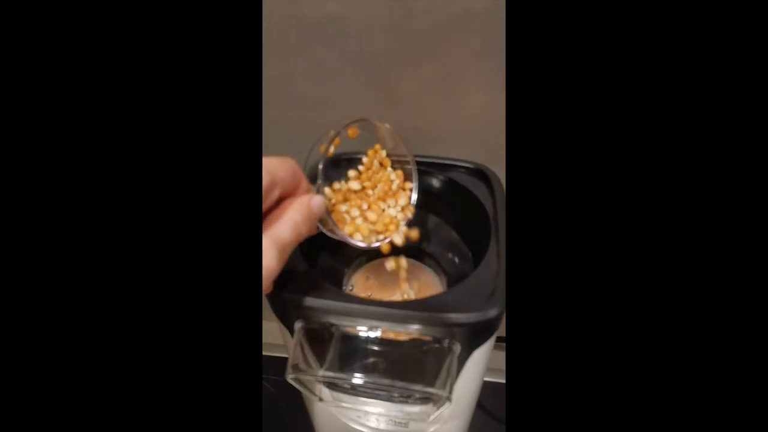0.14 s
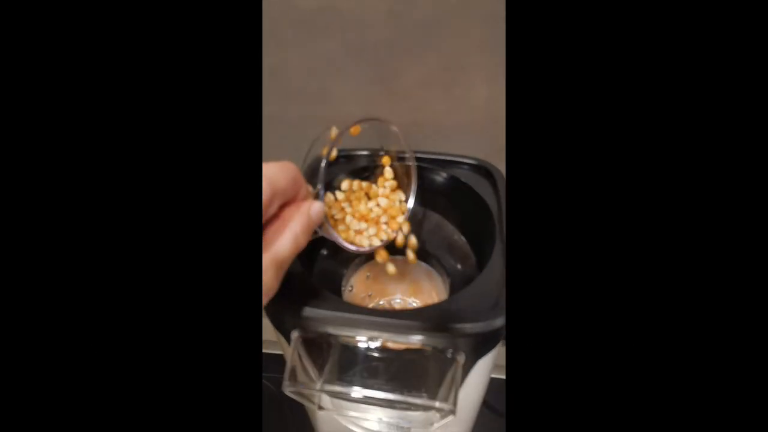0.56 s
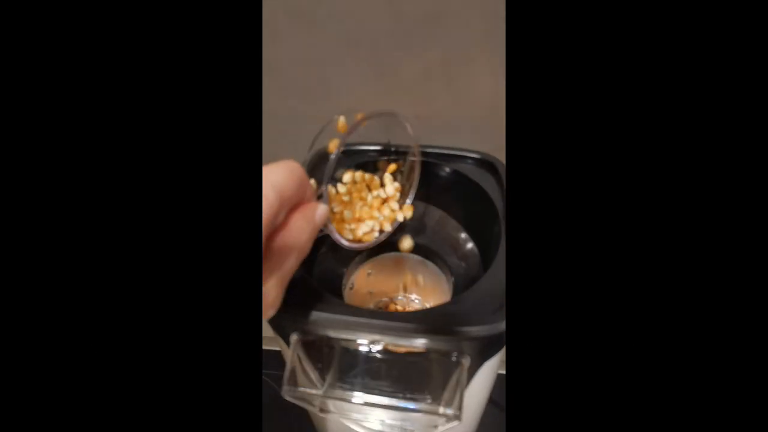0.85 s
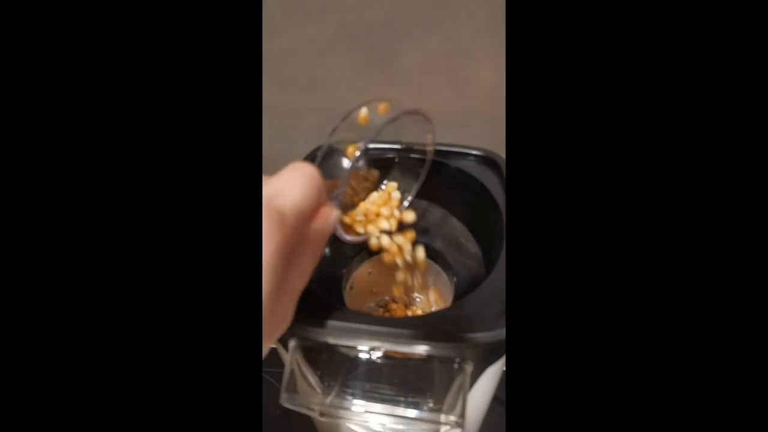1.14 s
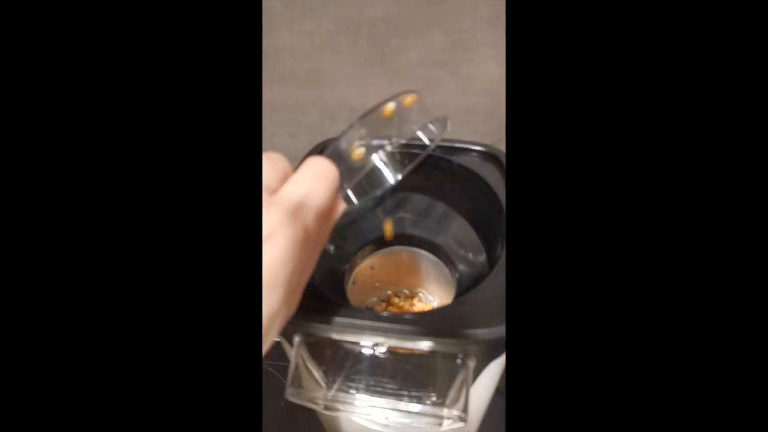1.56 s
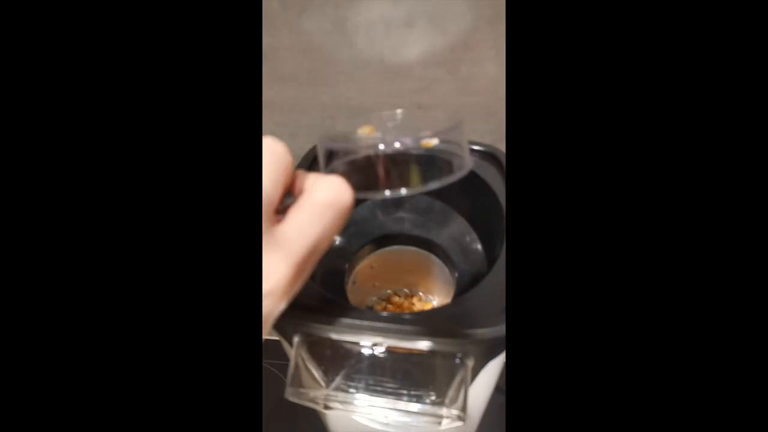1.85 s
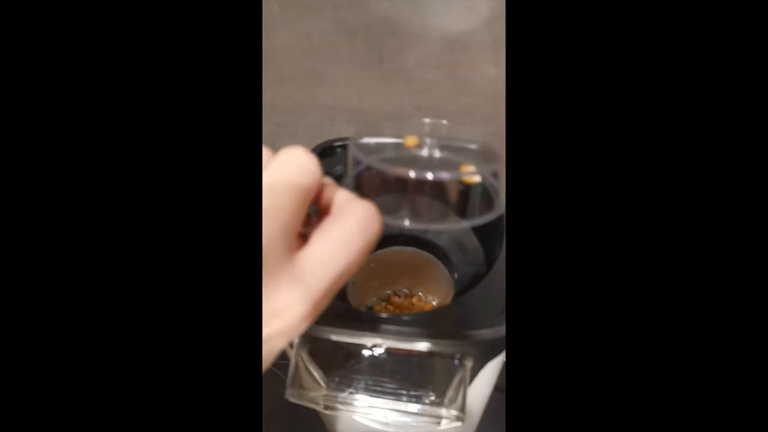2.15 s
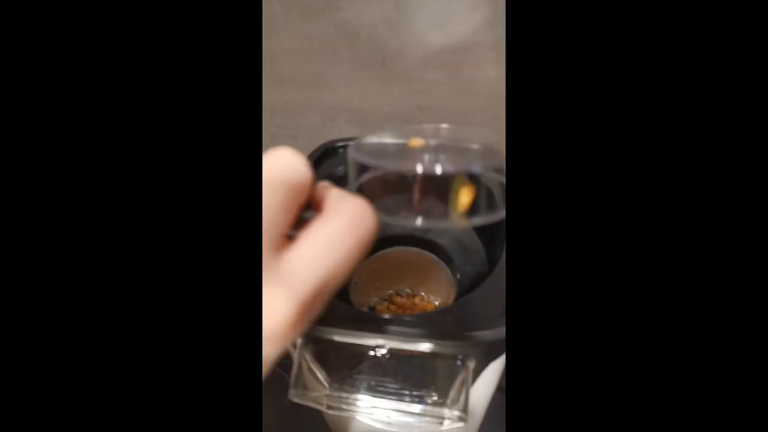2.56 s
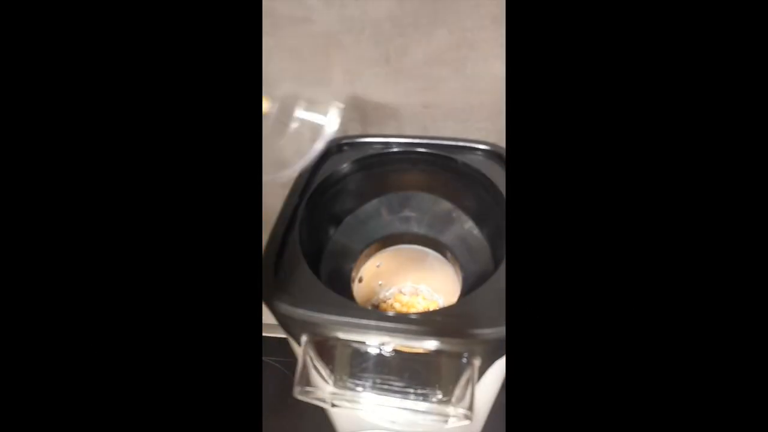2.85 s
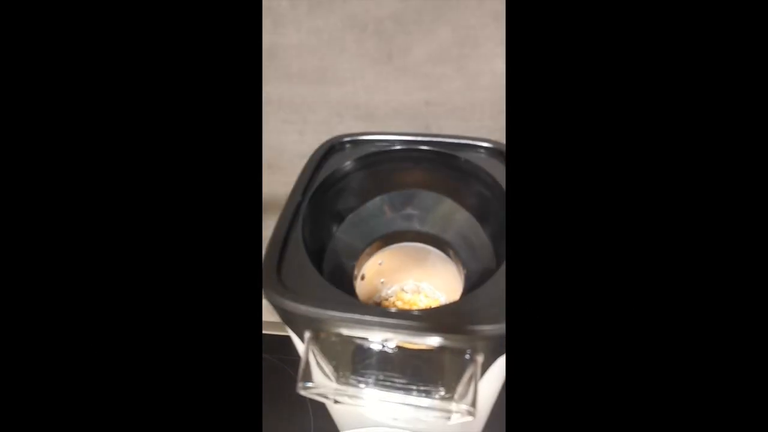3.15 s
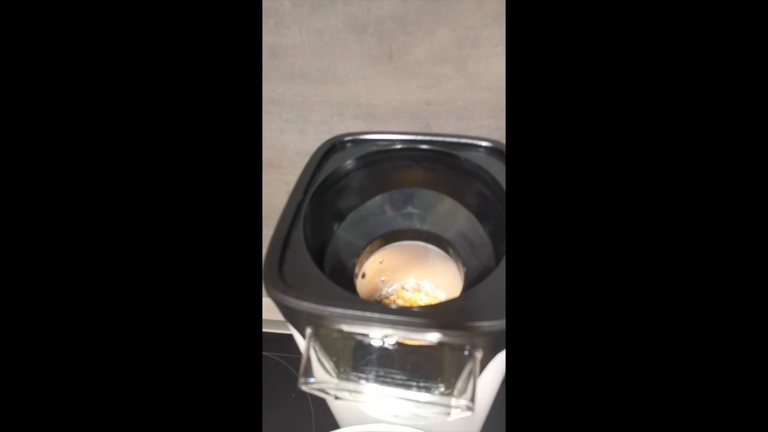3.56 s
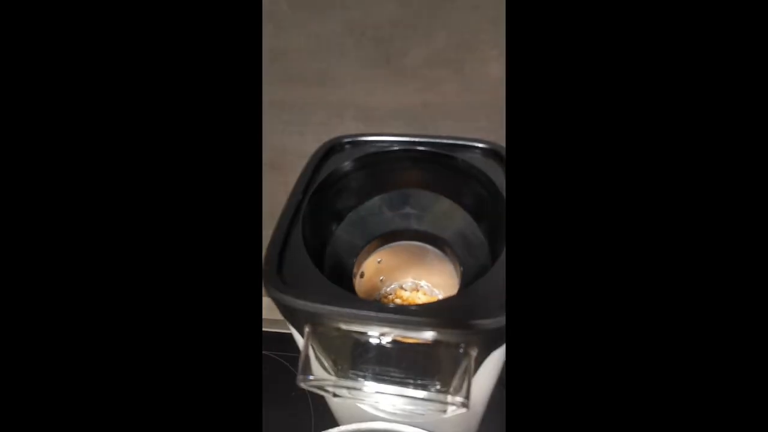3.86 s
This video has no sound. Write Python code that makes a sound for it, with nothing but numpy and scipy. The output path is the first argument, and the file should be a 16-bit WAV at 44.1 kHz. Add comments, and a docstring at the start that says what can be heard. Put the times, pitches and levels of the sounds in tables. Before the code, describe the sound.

Dry corn kernels pour in a dense, bright rattle into a popcorn machine, ringing briefly on bare metal, then scattered ticks, a couple of taps and a faint rustle; close stereo microphone, small quiet room.

```python
"""In a small room with a low hum, dry corn kernels are tipped from a glass bowl into a popcorn machine.
Decaying resonances of the bare metal pan sound at the start, along with dense random contacts of
kernel on kernel, which outlast them. The last rush strikes the plastic funnel, and lone kernels
tick in as short bursts of coloured noise. The bowl is drawn away with a few taps and a soft rustle
of grainy noise; the room adds a decaying tail."""
import sys
import numpy as np
from scipy import signal
from scipy.fft import rfft, irfft, next_fast_len
from scipy.io import wavfile
from scipy.ndimage import uniform_filter1d

SR = 44100
rng = np.random.default_rng(int(sys.argv[2]) if len(sys.argv) > 2 else 0)


def master_out(mix):
    """Clip the mix to full scale and print it as 16-bit PCM to the path in sys.argv[1]."""
    frames = np.transpose(np.atleast_2d(mix))
    ceiling = np.clip(frames, -1, 1)
    pcm = np.round(ceiling * 32767).astype(np.int16)
    wavfile.write(sys.argv[1], SR, pcm)


N = 176400

# All spectra are relative: filtering restores the power of white noise.
# Spectrum of still air: (frequency [Hz], level [dB])
AIR_SPECTRUM = [(30, 0), (300, -13), (8000, -32.5), (11000, -44.5)]
# Low drone: (time [s], level [dB])
DRONE_LEVEL = [(2.08, -73.5), (2.3, -61), (2.6, -71.5), (3.15, -67.5), (4, -74.5)]
# Spectrum of the drone: (frequency [Hz], level [dB])
DRONE_SPECTRUM = [(90, -34.5), (130, 4.5), (172, 13), (240, -46.5)]
# Stream of kernels: (time [s], level [dB])
STREAM_LEVEL = [(0, -28), (.12, -34), (.26, -34.5), (.65, -37.5), (.95, -40.5), (1.17, -43), (1.27, -34),
                (1.46, -36), (1.535, -43), (1.56, -50), (1.9, -85.5)]
# Clumps landing in the stream, before CLUMP_DB: (time [s], level [dB])
CLUMP_BLOWS = [(0.016, -27.5), (.035, -18.5), (0.153, -27.5), (.2124, -28.5), (0.226, -27), (0.287, -27.5),
               (.328, -24.5), (0.362, -25.5), (.392, -23.5), (.424, -23.5), (.446, -25.5), (.514, -24.5),
               (.528, -24.5), (0.561, -22), (.571, -27), (.6, -22.5), (.619, -23.5), (.667, -24.5),
               (0.676, -22.5), (0.7307, -21), (.755, -27), (.805, -22), (.838, -21.5), (.868, -26.5),
               (0.913, -21.5), (0.994, -24), (1.0435, -21), (1.082, -21), (1.118, -22), (1.198, -21),
               (1.22, -20.5), (1.252, -23), (1.397, -23), (1.448, -24.5), (1.505, -23), (1.522, -22)]
# Spectrum of a kernel's click in the chamber: (frequency [Hz], level [dB])
RATTLE_SPECTRUM = [(800, -25), (1500, -16.5), (1900, -25.5), (2220, -10.5), (2550, -30.5), (3300, -9),
                   (4000, -13.5), (5850, -6), (6350, -8.5), (6950, -1), (8000, 1), (8350, -6), (9000, -7),
                   (10100, -17.5), (12000, -26)]
# Left-right balance of the pour: (frequency [Hz], left minus right [dB])
POUR_BALANCE = [(300, 6), (2300, -6.5), (5000, -2.5), (6800, 5.5), (9000, -3.5), (12000, 0)]
# Resonances of the bare pan: (frequency [Hz], bandwidth [Hz], relative level [dB])
PAN_MODES = [(1171, 260, -6), (1497, 350, -0.5), (2930, 810, -6.5), (5520, 87, 1.5), (9500, 5000, -13)]
# Hard blows on the housing, before PUSH_DB and CRACK_DB: (time [s], level [dB])
HARD_BLOWS = [(0.018, -31), (.156, -32), (.196, -33), (0.287, -44), (.5, -50), (.514, -46.5), (.621, -48),
              (.731, -39), (1.045, -53.5), (1.562, -51), (1.98, -54), (2.748, -50)]
# Spectrum of the shaken housing: (frequency [Hz], level [dB])
HOUSING_SPECTRUM = [(25, 1), (200, -6.5), (800, -7.5), (2200, -1.5), (7000, -42.5)]
# Soft handling bumps: (time [s], level [dB])
SOFT_BUMPS = [(2.748, -55.5), (3.528, -62.5), (3.61, -68.5)]
# Hollow resonances of the housing: (frequency [Hz], bandwidth [Hz], relative level [dB])
HOUSING_MODES = [(151, 18, 4), (250, 50, -5.5), (484, 34, 3), (694, 70, -3.5), (1321, 24, -1.5),
                 (2280, 60, -9.5)]
# Reverberation of the room: (frequency [Hz], 60 dB decay time [s])
ROOM_DECAY = [(200, 0.58), (7000, 0.5)]
# Single ticks of kernels and bowl; body and fine treble are before BODY_DB and FINE_DB:
# (time [s], level [dB], body re level [dB], bright ring re level [dB], fine treble re level [dB])
TICK_BLOWS = [(1.562, -29.5, -0.5, 0, 6.5), (1.57, -32, -2.5, -9, -2), (1.596, -29.5, -7, -7, -1),
              (1.615, -37, -4, -4, -3), (1.692, -28, -0.5, -4.5, -2), (1.728, -27.5, -6.5, -15, -8),
              (1.747, -44, 4.5, 4, 1.5), (1.829, -43, -2.5, 9, 14.5), (1.919, -32, 1, 0, 4),
              (1.979, -34, 1, 2, 13.5), (2.025, -32.5, -2.5, -7.5, -20), (2.748, -35.5, 0.5, 5.5, 12.5),
              (2.851, -37, -6, -27, -21), (2.91, -36.5, 2.5, 1, -9)]
# Spectrum of a click on the funnel wall: (frequency [Hz], level [dB])
CLICK_SPECTRUM = [(2000, -31), (3300, -4.5), (5900, -6), (7000, -1.5), (11000, -43.5)]
# Spectrum of the funnel's hollow body: (frequency [Hz], level [dB])
BODY_SPECTRUM = [(600, -28), (1020, -3), (1800, -8), (2200, 3), (2550, -13), (3400, -24.5)]
# Spectrum of a tick's fine treble edge: (frequency [Hz], level [dB])
FINE_SPECTRUM = [(6000, -28.5), (10000, -9), (13400, -14)]
# Bright resonances of a tick: (frequency [Hz], bandwidth [Hz], relative level [dB])
RING_MODES = [(7010, 160, -7.5), (7780, 450, 2), (9530, 1100, -13)]
# Bowl and sleeve drawn away: (time [s], level [dB])
RUSTLE_LEVEL = [(2.74, -120), (2.81, -64.5), (2.87, -55), (2.96, -72), (3.11, -57.5), (3.22, -67.5),
                (3.38, -85), (3.55, -120)]
# Spectrum of the rubbing: (frequency [Hz], level [dB])
RUSTLE_SPECTRUM = [(100, -15), (300, -4.5), (3000, -2), (4500, -12), (7500, -10.5), (12000, -40)]

AIR_DB, HUM_HZ, HUM_DB = -73.5, 97.4, -71
# Contacts in the stream: mean rate, spread of sizes, 60 dB decay time
CONTACTS_PER_S, CONTACT_SPREAD_DB, CONTACT_T60_S = 700, 3.5, 0.012
CLUMP_DB, CLUMP_T60_S = -6.5, 0.066
CLUMP_THUD_DB, PAN_THUD_DB = -20, -9  # clumps and the pan shake the housing too
SLIDE_S, SLIDE_END_S, SLIDE_DB = 1.19, 1.535, -47  # the last rush strikes the funnel wall
KERNEL_VARIETY_DB, TICK_VARIETY_DB = 2.5, 2.5  # no two kernels ring alike
PAN_DB, PAN_BARE_S, PAN_MUFFLE_DB_PER_S = -37, 0.14, 111.5  # the growing heap damps the pan
PUSH_DB, CRACK_DB = 20.5, 15  # a hard blow's push on the housing, and its sharp crack
RISE_S = 0.00035  # time constant of a blow's onset
TICK_HOLD_S, TICK_T60_S = 0.0021, 0.036
BODY_DB, FINE_DB = -10.5, -18.5
TICK_LEAN_DB = -4.5  # left minus right
FUNNEL_DB, FUNNEL_GROWS = -18.5, 0.71  # the ring grows as this power of the rubbing, so more slowly
ROOM_DB, RING_ROOM_SHARE = -10, 0.4
TOP_HZ = 15100  # upper band limit


def amp(db):
    """Logarithmic level: decibels become an amplitude ratio."""
    return 10 ** (np.asarray(db) / 20)


def unit(x):
    """Power normalisation: scale to an rms of 1."""
    return x / np.sqrt(np.mean(x ** 2) + 1e-20)


def along(points, hz):
    """Logarithmic interpolation: (frequency, value) points joined on a log frequency axis."""
    f, v = np.transpose(points)
    return np.interp(np.log(hz + 1), np.log(f + 1), v)


def level(rows):
    """Amplitude envelope: gain per sample, with the level linear in decibels between points."""
    return amp(np.interp(np.arange(N) / SR, *np.transpose(rows)))


def filtered(x, response):
    """Linear filtering: multiply the spectrum by a function of frequency."""
    m = 2 * next_fast_len(N)
    spectrum = rfft(x, m)
    return irfft(spectrum * response(np.fft.rfftfreq(m, 1 / SR)), m)[..., :N]


def coloured(x, points):
    """Minimum-phase filtering: a causal spectrum that keeps the power of white noise."""
    def response(hz):
        cepstrum = irfft(np.log(unit(amp(along(points, hz)))))
        # Folding the cepstrum onto positive time makes the filter causal.
        half = len(cepstrum) // 2
        cepstrum[1:half] *= 2
        cepstrum[half + 1:] = 0
        return np.exp(rfft(cepstrum))
    return filtered(x, response)


def resonate(x, modes):
    """Modal resonance: band-pass modes of alternating sign that keep the power of white noise."""
    def response(hz):
        total = 0
        for k, (centre, width, db) in enumerate(modes):
            damping = 1j * hz * width
            total = total + (-1) ** k * amp(db) * damping / (centre ** 2 - hz ** 2 + damping)
        return total / np.sqrt(np.mean(np.abs(total) ** 2))
    return filtered(x, response)


def noise(alike):
    """Partial coherence: stereo white noise with a share of its power common to both sides."""
    left, right, common = rng.standard_normal((3, N))
    share = np.clip(alike, 0, 1)
    return np.sqrt(share) * common + np.sqrt(1 - share) * np.array([left, right])


def varied(depth_db):
    """Spectral fluctuation: stereo noise whose random colour changes every few milliseconds."""
    z = signal.stft(noise(0), nperseg=256)[2]
    field = rng.standard_normal(z.shape[1:])
    field = uniform_filter1d(field, size=3, axis=0)  # across frequency
    field = unit(uniform_filter1d(field, size=4, axis=1))  # across time
    gain = unit(amp(depth_db * np.clip(field, -2, 2)))
    return signal.istft(z * gain, nperseg=256)[1][:, :N]


def sides(lean_db):
    """Stereo level difference: left and right gains, half the difference each."""
    return amp(np.multiply.outer([.5, -.5], np.atleast_1d(lean_db)))


def fade(t, t60):
    """Exponential damping: amplitude falls 60 dB in t60 seconds."""
    return np.exp(-np.log(1000) * t / t60)


def impulses(rows):
    """Impulsive excitation: one spike for each (time [s], level [dB]) row."""
    s, db = np.transpose(list(rows))
    return np.bincount(np.abs(np.round(s * SR)).astype(int), amp(db), N)


def power_sum(spikes, shape):
    """Energy addition: the powers of overlapping envelopes add."""
    return np.sqrt(np.abs(signal.fftconvolve(np.square(spikes), np.square(shape))[:N]))


def bursts(rows, hold, t60):
    """Transient envelope: each blow rises, holds briefly and decays exponentially."""
    t = np.arange(N) / SR
    shape = (1 - np.exp(-t / RISE_S)) * fade(np.maximum(t - hold, 0), t60)
    return power_sum(impulses(rows), shape)


def patter(rate, spread_db, t60):
    """Shot noise: envelope of tiny contacts at random times, scaled to rms 1."""
    struck = rng.random(N) < rate / SR
    sizes = struck * amp(spread_db * np.clip(rng.standard_normal(N), -2, 2))
    return unit(power_sum(sizes, fade(np.arange(SR // 10) / SR, t60)))


def background():
    """Stationary tone and noise: a steady sine hum and still air, with a low drone of varying level."""
    hum = amp(HUM_DB) * unit(np.sin(2 * np.pi * HUM_HZ * np.arange(N) / SR)) * sides(-5)
    air = amp(AIR_DB) * coloured(noise(0.16), AIR_SPECTRUM)
    drone = level(DRONE_LEVEL) * coloured(noise(0.18), DRONE_SPECTRUM)
    return hum + air + drone


def pour():
    """Superposed impacts: stream and clumps click in the chamber; the last rush hits the funnel."""
    t = np.arange(N) / SR
    stream = level(STREAM_LEVEL) * (t < STREAM_LEVEL[-1][0])
    stream = stream * patter(CONTACTS_PER_S, CONTACT_SPREAD_DB, CONTACT_T60_S)
    clumps = amp(CLUMP_DB) * bursts(CLUMP_BLOWS, 0.0012, CLUMP_T60_S)
    clumps = clumps * patter(rate=2500, spread_db=1, t60=0.0035)
    contacts = np.hypot(stream, clumps) * varied(KERNEL_VARIETY_DB)
    rattle = coloured(contacts, RATTLE_SPECTRUM)
    thud = amp(CLUMP_THUD_DB) * coloured(clumps * noise(0), HOUSING_SPECTRUM)
    rush = amp(SLIDE_DB) * (t > SLIDE_S) * (t < SLIDE_END_S)
    rush = rush * patter(rate=600, spread_db=9.5, t60=TICK_T60_S) * varied(TICK_VARIETY_DB)
    funnel = coloured(rush, CLICK_SPECTRUM) + amp(BODY_DB) * coloured(rush, BODY_SPECTRUM)
    return filtered(rattle + thud + funnel, lambda hz: sides(along(POUR_BALANCE, hz)))


def pan():
    """Modal excitation: kernels ring and drum on bare metal until the heap covers it."""
    covered_s = np.maximum(np.arange(N) / SR - PAN_BARE_S, 0)
    bareness = amp(PAN_DB - PAN_MUFFLE_DB_PER_S * covered_s)
    blows = bareness * patter(rate=700, spread_db=0.5, t60=.005) * noise(0.21)
    return resonate(blows, PAN_MODES) + amp(PAN_THUD_DB) * coloured(blows, HOUSING_SPECTRUM)


def room(x):
    """Reverberation: a small room's diffuse tail, with a decay time for each frequency."""
    hz, t, z = signal.stft(rng.standard_normal((2, SR * 3 // 4)), SR, nperseg=256)
    tail = signal.istft(z * fade(t, along(ROOM_DECAY, hz)[:, None]), SR, nperseg=256)[1]
    tail = tail / np.linalg.norm(tail[0])
    tail = np.pad(tail, ((0, 0), (SR // 200, 0)))  # the tail starts 5 ms late
    mono = x.sum(axis=0)[None] / np.sqrt(2)
    return signal.fftconvolve(mono, tail, axes=1)[:, :N]


def knocks():
    """Impulse response: a hard blow is a dull push and sharp crack; a soft bump rings the housing."""
    blows = impulses(HARD_BLOWS)
    push = amp(PUSH_DB) * coloured(blows, HOUSING_SPECTRUM)
    crack = amp(CRACK_DB) * coloured(blows, RATTLE_SPECTRUM)
    shudder = resonate(bursts(SOFT_BUMPS, TICK_HOLD_S, 0.061) * noise(0), HOUSING_MODES)
    return push + crack + shudder


def ticks():
    """Isolated impact: a click with hollow body and fine edge, and separately its resonant bright ring."""
    s, db, body_db, ring_db, fine_db = np.transpose(TICK_BLOWS)

    def strike(levels_db, hold):
        """Noise excitation: a decaying burst at each tick."""
        envelope = bursts(zip(s, levels_db), hold, TICK_T60_S)
        return sides(TICK_LEAN_DB) * envelope * varied(TICK_VARIETY_DB)

    click = coloured(strike(db, TICK_HOLD_S), CLICK_SPECTRUM)
    # The body is held longer and leans further right.
    body = sides(-2) * coloured(strike(db + body_db + BODY_DB, 0.0057), BODY_SPECTRUM)
    fine = coloured(strike(db + fine_db + FINE_DB, TICK_HOLD_S), FINE_SPECTRUM)
    ring = resonate(strike(db + ring_db, TICK_HOLD_S), RING_MODES)
    return click + body + fine, ring


def rustle():
    """Friction noise: grainy rubbing excites a hollow ring as the bowl is drawn away."""
    effort = level(RUSTLE_LEVEL)
    scrapes = patter(rate=2300, spread_db=0.5, t60=.03) * noise(0.37) * sides(-7)
    rubbing = coloured(effort * scrapes, RUSTLE_SPECTRUM)
    hollow = amp(FUNNEL_DB) * resonate(effort ** FUNNEL_GROWS * scrapes, HOUSING_MODES)
    return rubbing + hollow


def scene():
    """Superposition: direct sounds, their reverberation, knocks and background add linearly."""
    clicks, ring = ticks()
    near = pour() + pan() + clicks + rustle()
    reverberation = amp(ROOM_DB) * room(near + RING_ROOM_SHARE * ring)
    return near + ring + reverberation + knocks() + background()


def record(dry):
    """Band limitation: a very steep low-pass removes what lies above TOP_HZ."""
    return filtered(dry, lambda hz: 1 / np.sqrt(1 + (hz / TOP_HZ) ** 160))


dry = scene()
out = record(dry)
master_out(out)
```